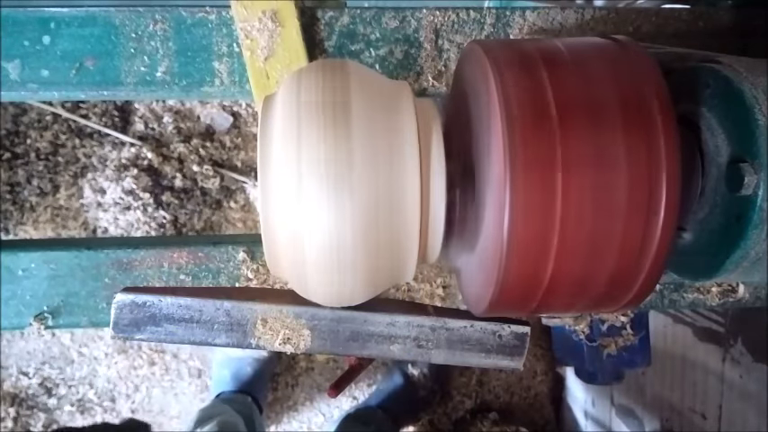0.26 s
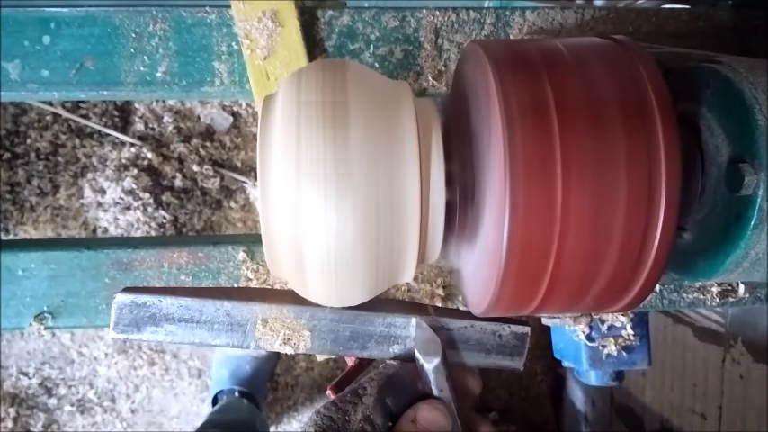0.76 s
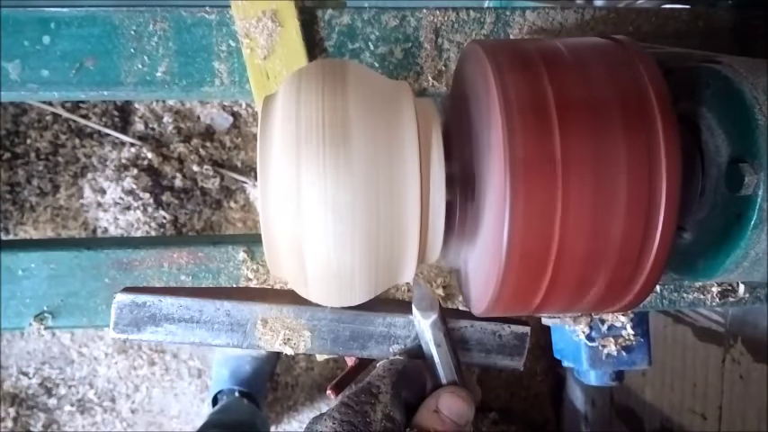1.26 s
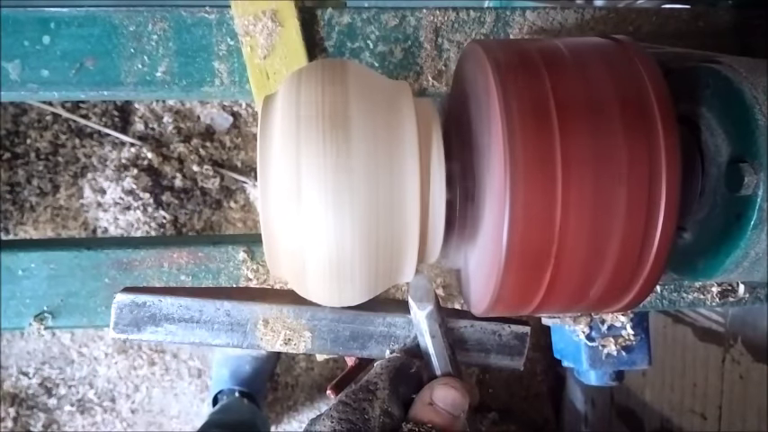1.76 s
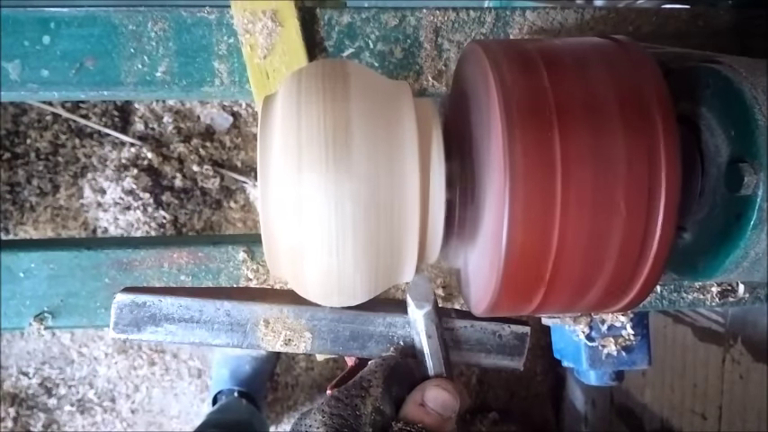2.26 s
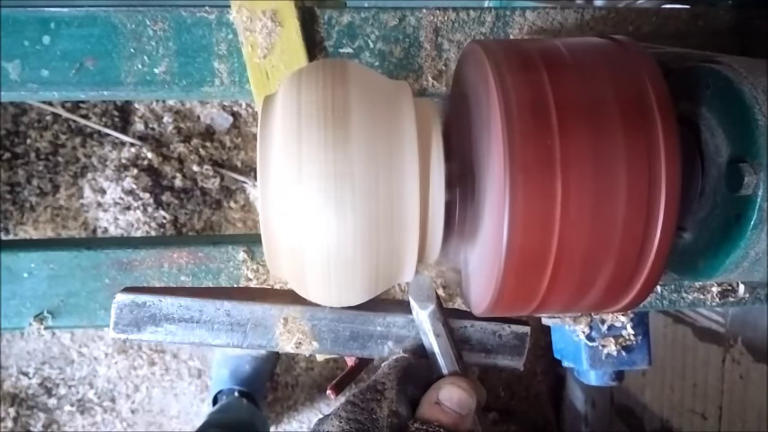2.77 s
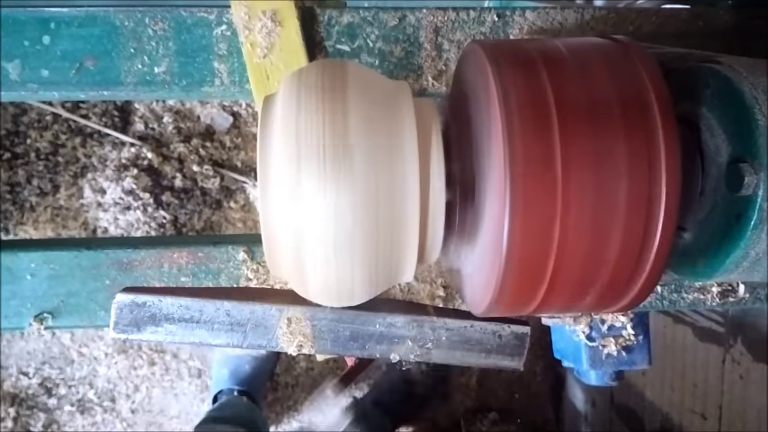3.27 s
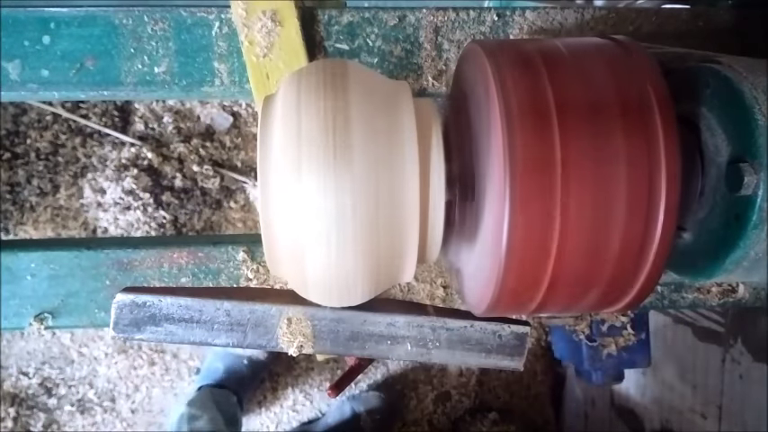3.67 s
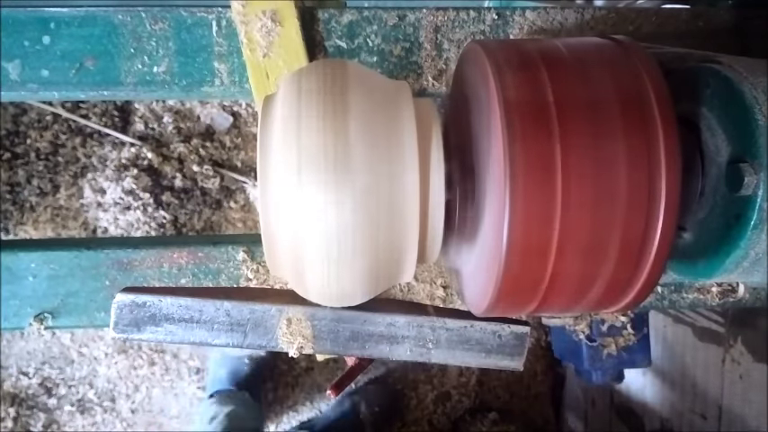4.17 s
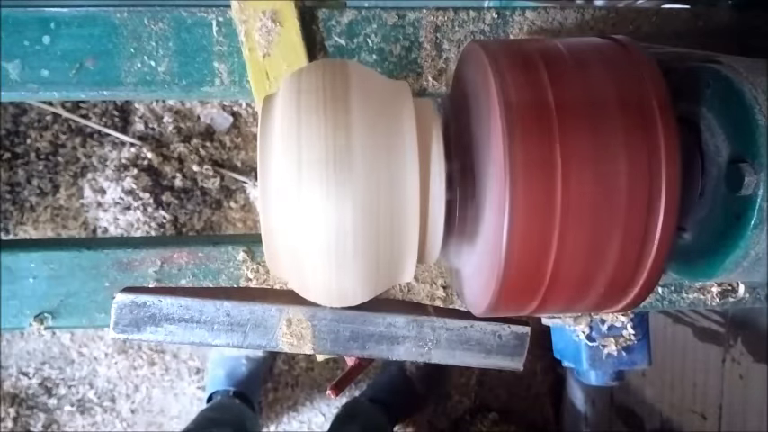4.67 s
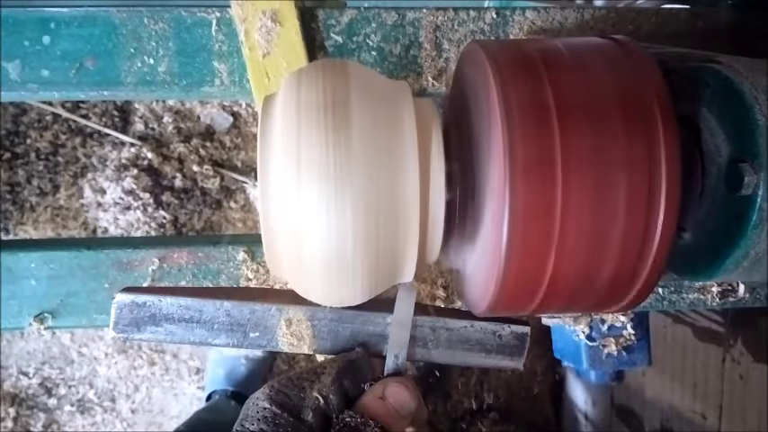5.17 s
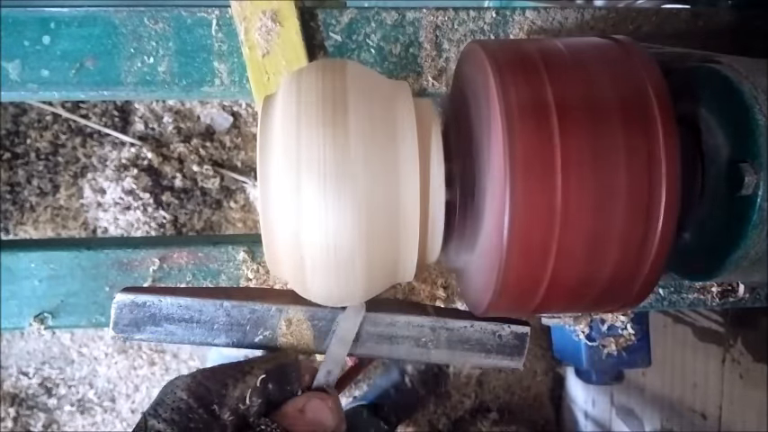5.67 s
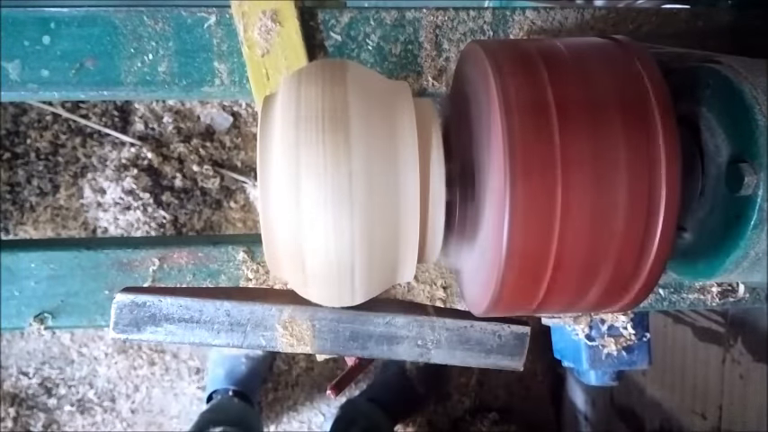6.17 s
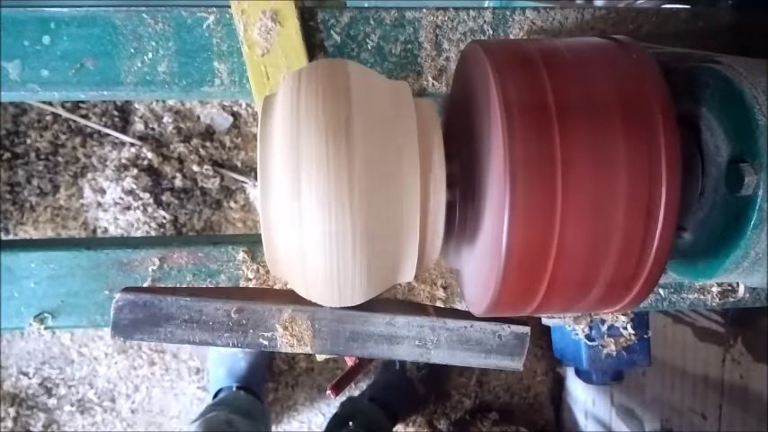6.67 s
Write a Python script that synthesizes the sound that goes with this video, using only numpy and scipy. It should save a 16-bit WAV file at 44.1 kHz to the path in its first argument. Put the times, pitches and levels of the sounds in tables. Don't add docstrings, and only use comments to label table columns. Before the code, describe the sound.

Close workshop lathe: motor drone and rushing noise, short raspy chisel cuts, steel taps on the tool rest, a switch thud and spindle coasting down.

```python
import sys
import numpy as np
from scipy import signal
from scipy.fft import rfft, irfft, next_fast_len
from scipy.io import wavfile
from scipy.ndimage import uniform_filter1d

SR = 44100
rng = np.random.default_rng(int(sys.argv[2]) if len(sys.argv) > 2 else 0)


def unload_audio(sound):
    columns = np.transpose(np.atleast_2d(sound))
    steps = np.round(np.clip(columns, -1, 1) * 32767)
    wavfile.write(sys.argv[1], SR, steps.astype(np.int16))


def voltage_ratio(level):
    return 10 ** (np.asarray(level, float) / 20)


N = 305167
T = np.arange(N) / SR
HZ = np.maximum(np.fft.rfftfreq(next_fast_len(N), 1 / SR), 1)
HUM_HZ, SPINDLE_HZ, BELT_HZ, BEARING_HZ = 400.03, 75.65, 66.63, 171.58
OFF_S = 6.465
SWAP_S = 4.5


def rms_one(x):
    return x / np.sqrt(np.mean(x ** 2) + 1e-20)


def in_time(rows):
    s, *columns = np.transpose(rows)
    return [np.interp(T, s, c) for c in columns]


def at_hz(points):
    hz, db = np.array(points)[:, 0], np.array(points)[:, 1]
    return np.interp(np.log(HZ), np.log(hz), db)


def drift(rate, count=1):
    r = np.exp(-80 * np.pi * rate / SR)
    white = rng.standard_normal((count, len(T[::40]) + 2000))
    slow = signal.lfilter([1], [1, -2 * r, r * r], white)[:, 2000:]
    return slow / slow.std(axis=1, keepdims=True)


def every_sample(slow):
    return np.interp(T, T[::40], slow)


def wander(rate):
    return every_sample(drift(rate)[0])


def swell(s, half):
    return np.exp(-.5 * ((T - s) / half) ** 2)


def through(x, gain):
    size = next_fast_len(N)
    return irfft(rfft(x, size) * gain, size)[..., :N]


def colour(x, points, modes):
    boost_db = sum(db / (1 + (2 * (HZ - hz) / width) ** 2) for hz, width, db in modes)
    return through(x, voltage_ratio(at_hz(points) + boost_db))


def resonate(x, modes):
    out = 0
    for k, (hz, width, db) in enumerate(modes):
        r = np.exp(-np.pi * width / SR)
        poles = [1, -2 * r * np.cos(2 * np.pi * hz / SR), r * r]
        out = out + (-1) ** k * voltage_ratio(db) * signal.lfilter([1 - r, 0, r - 1], poles, x)
    return out


def sliding(x, hz, width_hz):
    carrier = np.exp(2j * np.pi * np.cumsum(hz + 0 * T) / SR)
    r = np.exp(-np.pi * width_hz * 1.5 / SR)
    return rms_one((signal.lfilter([1], [1, -2 * r, r * r], x / carrier) * carrier).real)


def rings(x, rows):
    out = 0
    for hz, width, db in rows:
        strength, pitch = drift(12.5, count=2)
        level = every_sample(voltage_ratio(db + 3.5 * strength))
        out = out + level * sliding(x, hz * every_sample(1 + .008 * pitch), width)
    return out


def tones(rows, waver_db):
    out = np.zeros((2, N))
    for cycles, db, pan_db, blur in rows:
        strength, phase = drift(4.26, count=2)
        angle = 2 * np.pi * cycles + blur * phase
        wave = every_sample(np.sqrt(2) * voltage_ratio(db + waver_db * strength)) * np.sin(every_sample(angle))
        out[0] += wave * voltage_ratio(pan_db / 2)
        out[1] += wave * voltage_ratio(-pan_db / 2)
    return out


# (hum multiple, spindle sideband, level [dB rms], left-right [dB])
HUM = [(1, -1, -67, 1), (1, 0, -62, 6), (1, 1, -69, 0), (1, 2, -72, 0), (1, 3, -71, 0), (2, -2, -75, 0),
       (2, -1, -77, 0), (2, 0, -69, 0), (2, 1, -76, 3), (2, 2, -76, 1), (3, -1, -69, 2)]
# (multiple of belt lap, level [dB rms], left-right [dB])
BELT = [(1, -84, -1), (2, -90, -3), (5, -72, 3), (7, -65, -1), (8, -62, -1), (10, -69, 2), (11, -76, 2),
        (13, -74, 5), (14, -73, 2)]
# (multiple, belt sideband, level [dB rms], left-right [dB])
BEARING = [(4, 0, -75, 3), (7, 0, -65, 1), (9, -1, -75, 1), (9, 0, -65, 0), (9, 1, -72, 1), (10, 0, -70, 0),
           (11, 0, -72, -4), (12, 0, -71, 0), (14, 0, -71, -2), (16, 0, -71, -9), (19, 0, -67, 7),
           (20, 0, -69, 6), (22, 0, -65, 4), (23, 0, -69, 5)]
# (frequency [Hz], level [dB rms], left-right [dB])
WHINES = [(316.3, -77, 1), (378.8, -71, 1), (390.6, -74, 2), (542, -71, 0), (2164, -74, 0),
          (2593.7, -70, 2), (3525.1, -70, 1), (3591.7, -68, 6)]


def drive(turns, power):
    t, turns = T[::40], turns[::40]
    wobble = 0.26 / (2 * np.pi) * np.sin(2 * np.pi * 2.9 * turns)
    belt = BELT_HZ * turns + wobble
    hum = [(k * HUM_HZ * t + j * SPINDLE_HZ * t + (j < 0) / 2, db, pan, .15) for k, j, db, pan in HUM]
    belts = [(k * belt + rng.random(), db, pan, .45) for k, db, pan in BELT]
    balls = [(k * BEARING_HZ * turns + j * belt + rng.random(), db, pan, 0.07 * k)
             for k, j, db, pan in BEARING]
    balls += [(hz * turns, db, pan, .7) for hz, db, pan in WHINES]
    pulling = tones(hum, waver_db=1.5) + tones(belts, waver_db=-1.0)
    return pulling * power + tones(balls, waver_db=3.0) * (power + voltage_ratio(-12) * (1 - power))


def throbbing_noise(turns):
    throb = 1 + 0.07 * np.sin(2 * np.pi * BELT_HZ * turns) + 0.064 * np.sin(2 * np.pi * BEARING_HZ * turns)
    return rng.standard_normal((2, N)) * throb * every_sample(voltage_ratio(0.59 * drift(31)[0]))


# (frequency [Hz], level [dB per Hz])
POWERED = [(20, -21.5), (70, -12.5), (185, -22.5), (260, -15), (330, -4.5), (700, -3), (1000, -3.5),
           (1420, -3.5), (1700, -1), (2900, 0), (3900, 0), (4150, -2), (9000, -7), (15900, -12)]
# (frequency [Hz], level [dB per Hz])
COASTING = [(20, -15), (70, -17), (185, -23), (260, -21), (330, -15), (700, -5.5), (1000, -9.5), (1420, -9),
            (1700, 0), (2900, -3.5), (3900, -2), (4150, -5.5), (9000, -12), (15900, -22)]
# (frequency [Hz], width [Hz], boost [dB])
FRAME = [(530, 60, 4), (1080, 90, 7), (1190, 60, 6.5), (1600, 120, 2), (2190, 120, 4), (3300, 200, 2),
         (3590, 100, 2), (3790, 150, 3), (4880, 200, 2), (5810, 200, 2), (8300, 900, 3), (11500, 1500, -3),
         (12800, 300, 3), (14930, 150, 2)]
# (frequency [Hz], width [Hz], boost [dB])
COAST_MODES = [(376, 50, 12.5), (578, 35, 8), (800, 360, 0.5), (1143, 130, 5), (1704, 80, 1), (2220, 50, 4),
               (2490, 60, 3)]


def frame_rush(white, power, coast):
    level_db = -46.5 - 2.5 * coast - 26.5 * coast ** 2
    on = rms_one(colour(white, POWERED, FRAME))
    off = rms_one(colour(white, COASTING, FRAME + COAST_MODES))
    return voltage_ratio(level_db) * (power * on + (1 - power) * voltage_ratio(-4.0) * off)


# (time [s], share [0-1])
GRIP = [
    (0, 0.1),
    (.55, 0.24),
    (.85, 0.84),
    (3.3, 0.96),
    (3.4, 0),
    (4.7, 0.4),
    (4.85, 0.85),
    (5.5, 0.41),
    (5.9, 0.5),
    (6.92, 0.4),
]
# (frequency [Hz], width [Hz], level [dB])
REST = [(2550, 220, 0)]
# (frequency [Hz], width [Hz], level [dB])
HEADSTOCK = [(3333, 360, 1), (3574, 153, 5), (3766, 51, 5)]


def rest_and_headstock(white, turns, coast):
    grip = np.clip(in_time(GRIP)[0], 0, 1)
    fade_db = 29 * coast
    shaking = white[::-1] + 12 * np.diff(np.floor(BEARING_HZ * turns), prepend=0)
    rest_db = -56 - 10.5 * grip + 1.5 * wander(25) - fade_db
    head_db = -63.5 + 10 * grip + 0.5 * wander(6.3) - fade_db
    rest = rms_one(resonate(resonate(shaking, REST), REST))
    head = rms_one(resonate(resonate(white[::-1], HEADSTOCK), HEADSTOCK))
    return voltage_ratio(rest_db) * rest + voltage_ratio(head_db) * head


# (time [s], level [dB])
WHISTLING = [(0, -73), (.6, -71), (1.1, -70.5), (2, -72), (3.2, -79), (4.1, -74), (4.6, -79), (6.4, -82),
             (6.92, -100)]


def whistle(white):
    return voltage_ratio(in_time(WHISTLING)[0] + 2.5 * wander(10)) * sliding(white, 14930, 110)


# (time [s], level [dB])
DRONING = [(0, -64), (.17, -56.5), (.6, -60), (.94, -69), (1.5, -53.5), (1.65, -67), (1.84, -61),
           (2.15, -66), (3.4, -67), (4.1, -58), (4.34, -74), (4.5, -60), (5.0, -67), (5.3, -55.5),
           (5.4, -69), (5.85, -52.5), (6.0, -62), (6.45, -61.5)]


def drone(white, power):
    return power * voltage_ratio(in_time(DRONING)[0]) * sliding(white, 1199, 20)


# (start [s], build-up [s], length [s], shaving level at full depth [dB])
STROKES = [(1.455, .05, 0.24, -57), (1.73, 0.08, 0.19, -54.5), (2.014, 0.053, 0.18, -53),
           (2.301, 0.061, 0.079, -53.5), (2.494, 0.045, 0.077, -59), (2.56, 0.099, 0.095, -52),
           (2.707, 0.11, 0.16, -50), (2.903, 0.026, 0.115, -53.5), (3.066, 0.029, 0.13, -53),
           (3.208, 0.047, 0.095, -53), (5.074, 0.063, 0.063, -49.5), (5.115, .045, 0.1, -55.5),
           (5.308, .02, 0.064, -51), (5.372, 0.023, 0.196, -47.5), (5.57, 0.037, 0.13, -49),
           (5.689, .035, 0.11, -53)]
# (time [s], half length [s], level [dB])
GRAZES = [(0.455, .008, -57), (0.66, 0.009, -56), (1.04, .008, -59), (2.425, .01, -62), (3.656, 0.011, -64),
          (4.156, .012, -55), (4.794, 0.014, -64), (4.894, 0.012, -61), (5.01, .01, -73),
          (6.125, .015, -64), (6.212, .02, -62), (6.318, 0.015, -58), (6.44, .012, -70)]


def pressure_of_edge(power):
    windage_db = -67.5 - T + 2.5 * wander(15)
    energy = voltage_ratio(2 * windage_db) * power
    flutter_db = .6 * wander(30)
    touch_db, lift_s = -12, 0.032
    for s, build, length, db in STROKES:
        ease_db_per_s = 10.5 if s > SWAP_S else -8
        end_db = db - ease_db_per_s * (length - build)
        times = [-.01, 0, build, max(length, build + .001), length + lift_s + .002]
        levels = [db - 40, db + touch_db, db, end_db, end_db - 18]
        shape_db = np.interp(T - s, times, levels, right=-200, left=-200)
        energy = energy + voltage_ratio(2 * (shape_db + flutter_db))
    energy = energy + sum(voltage_ratio(2 * db) * np.exp(-((T - s) / half) ** 2) for s, half, db in GRAZES)
    return np.sqrt(energy)


def torn_fibres(turns, second):
    turn = 2 * np.pi * SPINDLE_HZ * turns
    grain_db = np.where(second, 2.2, 1.1) * np.sin(turn - 1.6)
    grain_db += np.where(second, 1.3, .8) * np.sin(2 * turn - 3.5)
    torn = rng.random((2, N)) < 12000 / SR
    tears = torn * rng.standard_normal((2, N)) * voltage_ratio(grain_db + .9 * wander(25))
    return tears, tears * voltage_ratio(0.64 * grain_db)


# (frequency [Hz], level [dB per Hz])
SKEW = [(1500, -40), (3000, -5), (4500, -2.5), (6500, -6.5), (8000, -1.5), (10000, -1.5), (11700, -4),
        (13500, -1.5), (14500, -4), (15900, -11)]
# (frequency [Hz], width [Hz], boost [dB])
SKEW_MODES = [(10120, 700, -4), (11700, 900, -0.5), (13150, 200, 0), (14750, 300, 4)]
# (frequency [Hz], width [Hz], level [dB])
BLADE = [(5870, 52, 0.5), (6490, 106, 1)]
# (frequency [Hz], width [Hz], level against the hiss [dB])
SKEW_RINGS = [(10100, 420, -14), (12740, 200, -18), (13530, 260, -15), (14330, 420, -12.5)]


def skew_chisel(tears, chatter):
    hiss = rms_one(colour(tears, SKEW, SKEW_MODES))
    blade = voltage_ratio(-6.0 - 2 * wander(10)) * rms_one(resonate(chatter, BLADE))
    return hiss, blade + rings(tears, SKEW_RINGS)


# (frequency [Hz], level [dB per Hz])
PARTING = [(1500, -40), (3000, 1), (4500, -2), (6500, -4), (8000, -2), (9900, -4), (11600, -3), (13000, -3),
           (15000, -1), (15900, -3.5)]
# (frequency [Hz], width [Hz], boost [dB])
PARTING_MODES = [(3670, 190, 4.1), (10100, 900, 1.5), (8490, 300, 3.9), (12800, 200, 3), (15600, 200, 4)]
# (frequency [Hz], width [Hz], level against the hiss [dB])
PARTING_RINGS = [(10900, 300, -18), (12800, 300, -19)]
# (time [s], lower ring [Hz], upper ring [Hz])
PLUNGE = [(5.05, 9890, 14880), (5.37, 9980, 15100), (5.40, 10500, 15000), (5.46, 10000, 14900),
          (5.53, 9720, 14750), (5.6, 10050, 14800), (5.69, 9840, 14600), (5.74, 10050, 14800),
          (5.82, 9900, 14550)]
# (frequency [Hz], width [Hz], level [dB], share of the chatter boost)
PARTING_BLADE = [(5990, 200, -11, .9), (6370, 240, -18, 2.1)]
# (start [s], length [s], boost [dB])
SINGING = [
    (5.108, .03, 5),
    (5.384, .1, 6),
    (5.471, 0.073, 3.5),
    (5.635, .055, 0.5),
    (5.743, .055, 3),
]


def parting_chisel(tears, chatter):
    hiss = rms_one(colour(tears, PARTING, PARTING_MODES))
    singing_db = sum(db * np.exp(-((T - s - length / 2) / (length / 2)) ** 6) for s, length, db in SINGING)
    plunge = list(zip(in_time(PLUNGE), (650, 550), (-12, -17)))
    ring = rings(tears, PARTING_RINGS + plunge)
    ring += sum(voltage_ratio(db + share * singing_db) * sliding(chatter, hz, width)
                for hz, width, db, share in PARTING_BLADE)
    return hiss, ring


# (time [s], half length [s], level [dB])
CATCHES = [
    (2.827, 0.028, -50.5),
    (3.126, 0.028, -56),
    (5.13, 0.016, -68),
    (5.453, .08, -58),
]
# (frequency [Hz], width [Hz], level [dB])
BLANK = [(1010, 150, -7), (1280, 130, -3.5), (1740, 260, -8), (3350, 150, -1.5)]


def catches(tears):
    return sum(voltage_ratio(db) * swell(s, half) for s, half, db in CATCHES) * rms_one(resonate(tears, BLANK))


# (time [s], half length [s], level [dB], pitch [Hz], fall [Hz per s])
GROANS = [
    (2.806, .013, -52, 1090, 900),
    (2.812, .012, -56, 1200, 0.),
    (2.848, .018, -55.5, 960, 500),
    (2.835, .013, -58, 1780, 500),
    (2.81, .01, -58, 1560, 0.),
    (3.125, .022, -57, 1130, 600),
]


def groans():
    blur = .9 * wander(40)
    out = np.zeros(N)
    for s, half, db, hz, fall in GROANS:
        t = T - s
        out += np.sqrt(2) * voltage_ratio(db) * swell(s, half) * np.sin(2 * np.pi * (hz - fall * t / 2) * t + blur)
    return out


def chisels(turns, power):
    second = T > SWAP_S
    tears, chatter = torn_fibres(turns, second)
    skew_hiss, skew_ring = skew_chisel(tears, chatter)
    parting_hiss, parting_ring = parting_chisel(tears, chatter)
    hiss = np.where(second, parting_hiss, skew_hiss)
    hiss = hiss + (voltage_ratio(1.2 * wander(9)) - 1) * through(hiss, 1 / (1 + (9900 / HZ) ** 12))
    ring = np.where(second, parting_ring, skew_ring)
    return voltage_ratio(5.5) * pressure_of_edge(power) * (hiss + ring) + catches(tears) + groans()


# (time [s], peak level [dB], ring [Hz])
TAPS = [
    (0.344, -35, 2590),
    (3.5193, -34, 2548),
    (4.2958, -28.5, 8530),
    (4.47, -35, 2594),
    (6.8884, -49, 2220),
]


def taps():
    out = np.zeros((2, N))
    t = T[:SR // 8]
    for s, db, hz in TAPS:
        decay = np.exp(-t / 0.0014) + 0.21 * np.exp(-t / .015)
        crack = 0.5 * np.diff(rng.standard_normal((2, len(t) + 1))) * decay
        ring = np.sin(2 * np.pi * hz * t) * np.exp(-t / 0.0015)
        at = round((s + 0.00081) * SR)
        out[:, at:at + len(t)] += (voltage_ratio(db - 5) * (ring + crack))[:, :N - at]
    return out


# (time [s], half length [s], level [dB])
SET_DOWN = [
    (0.873, 0.032, -69),
]


def set_down():
    dull = rms_one(signal.lfilter([1], [1, -.96], rng.standard_normal(N)))
    return dull * sum(voltage_ratio(db) * swell(s, half) for s, half, db in SET_DOWN)


def switch_thud():
    peak_db, hz, t60_s = -33, 382, 0.099
    t = np.maximum(T - 6.443, 0)
    return voltage_ratio(peak_db - 60 * t / t60_s) * (1 - np.exp(-t / 0.011)) * np.sin(2 * np.pi * hz * t)


# (frequency [Hz], width [Hz], level [dB], wander [Hz])
COAST_RINGS = [(1162, 120, -58, 51), (2200, 34, -62.5, 12.3)]


def coast_rings(white, power, coast):
    out = 0
    for hz, width, db, wander_hz in COAST_RINGS:
        ring = sliding(white, hz + wander_hz * wander(4.8), width)
        out = out + (1 - power) * voltage_ratio(db - 8 * coast) * ring
    return out


# (frequency [Hz], likeness [0-1])
LIKENESS = [(40, 0.75), (130, 0.65), (300, 0.57), (1400, 0.95), (2200, 1), (3200, 0.6), (6000, 0.34),
            (7200, 0.11), (11000, 0.092), (12800, 0.21), (15000, 0.13)]
# (frequency [Hz], left-right [dB])
LEANING = [(60, 6), (110, -7), (200, 5.5), (380, 2), (700, 0.5), (1290, 2), (2380, 0.5), (4400, 2.5),
           (8120, 1.0), (15000, -1.5)]


def ports(pair):
    alike, lean = np.clip(at_hz(LIKENESS), 0, 1), voltage_ratio(at_hz(LEANING) / 2)
    right = through(pair[0], alike / lean) + through(pair[1], np.sqrt(1 - alike ** 2) / lean)
    return np.array([through(pair[0], lean), right])


def spindle_turns(coast):
    cutting = sum(1. * (T > s + build) * (T < s + length) for s, build, length, _ in STROKES)
    load = uniform_filter1d(cutting, size=round(.25 * SR))
    return T - .0028 * np.cumsum(load) / SR - 0.1 * coast ** 2


def scene():
    coast = np.maximum(T - OFF_S, 0)
    power = np.exp(-coast / .012)
    airing = np.exp(-np.maximum(T - 6.445, 0) / .045)
    turns = spindle_turns(coast)
    white = throbbing_noise(turns)
    rush = frame_rush(white, airing, coast) + rest_and_headstock(white, turns, coast)
    air = rng.standard_normal((2, N))
    squeals = whistle(air) + drone(air, power) + coast_rings(air, power, coast)
    knocks = taps() + set_down() + switch_thud()
    return drive(turns, power) + ports(rush + chisels(turns, airing) + squeals) + knocks


def top_cut(x):
    return signal.sosfilt(signal.butter(12, 16090, fs=SR, output="sos"), x)


# (frequency [Hz], lag [radians])
LEFT_LAG = [(300, 0.12), (1400, 0.41), (2700, 1.43), (3500, 1.59), (5500, 2.84), (8500, 5.34), (12800, 8.9)]


def record(dry):
    left = through(dry[0], np.exp(-1j * at_hz(LEFT_LAG)))
    mix = through(np.array([left, dry[1]]), HZ < 15740)
    return top_cut(mix)


dry = scene()
out = record(dry)
unload_audio(out)
```